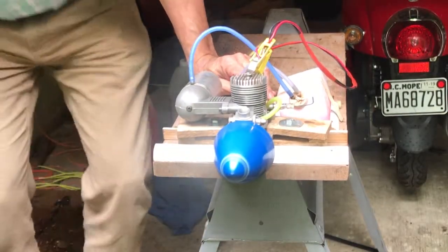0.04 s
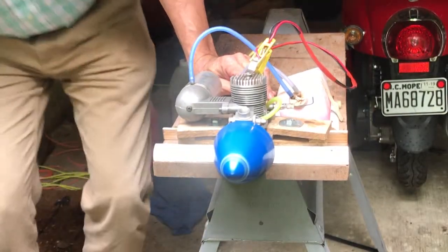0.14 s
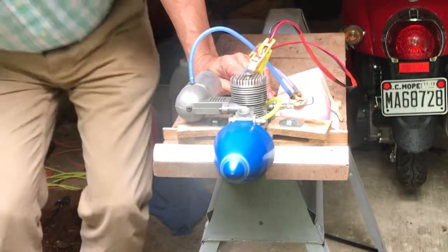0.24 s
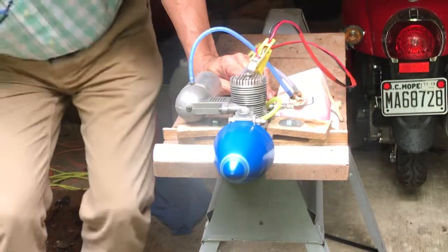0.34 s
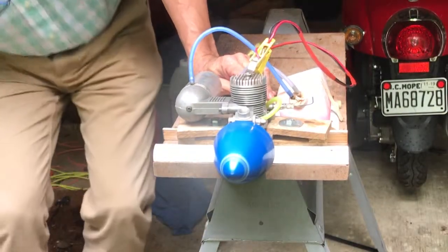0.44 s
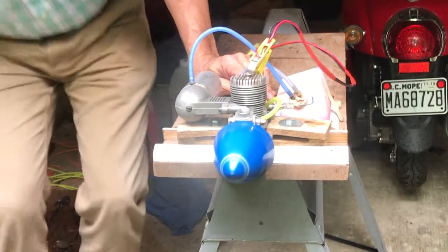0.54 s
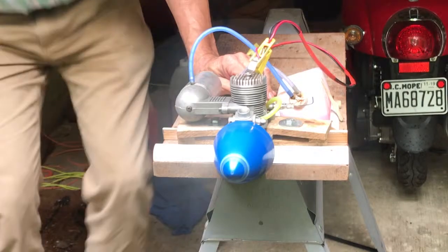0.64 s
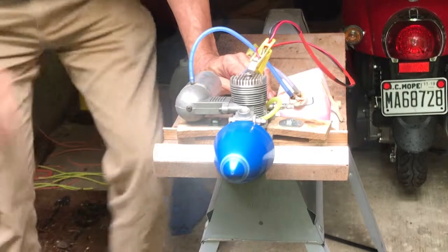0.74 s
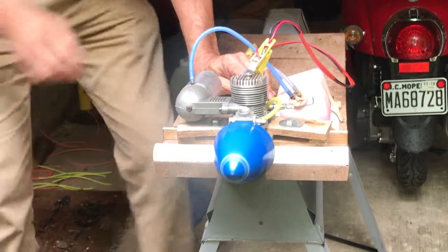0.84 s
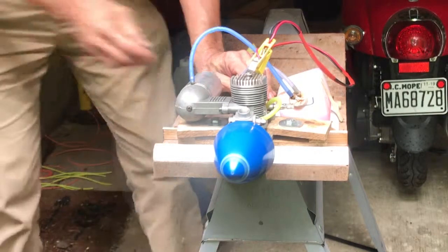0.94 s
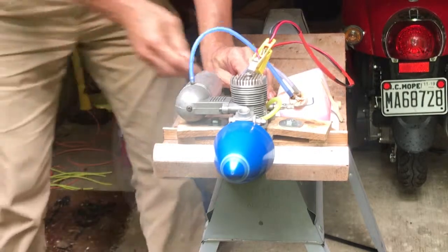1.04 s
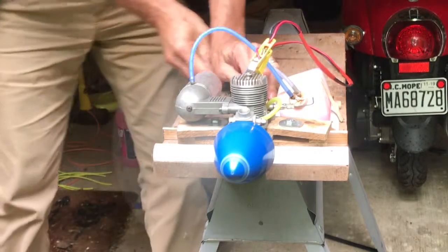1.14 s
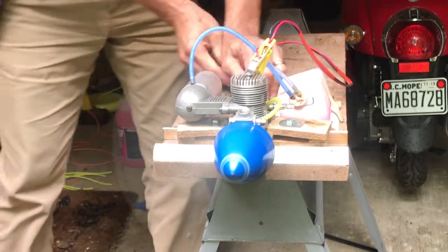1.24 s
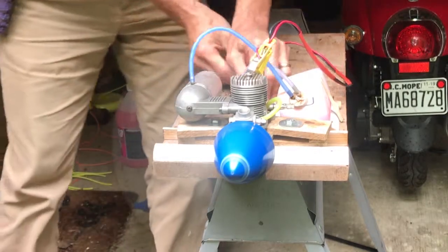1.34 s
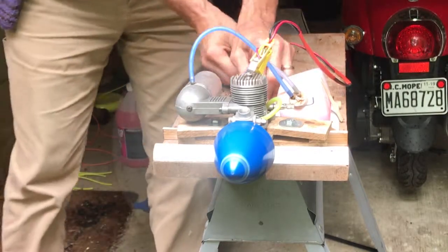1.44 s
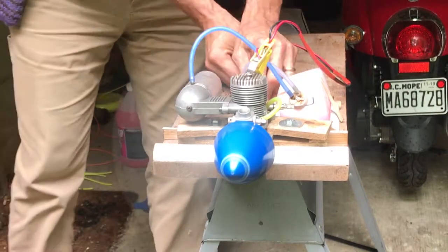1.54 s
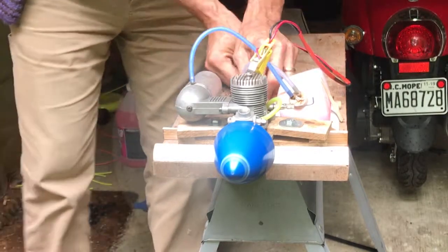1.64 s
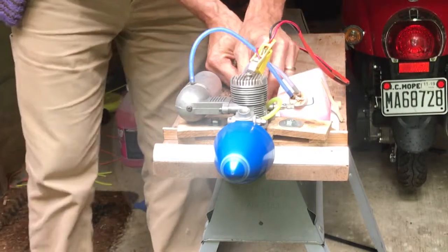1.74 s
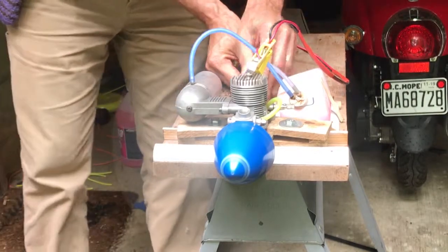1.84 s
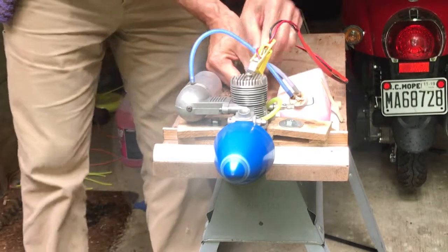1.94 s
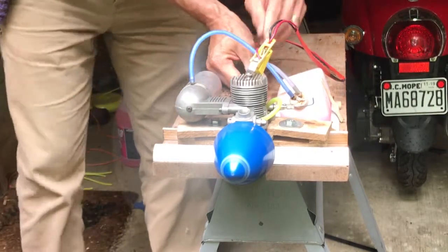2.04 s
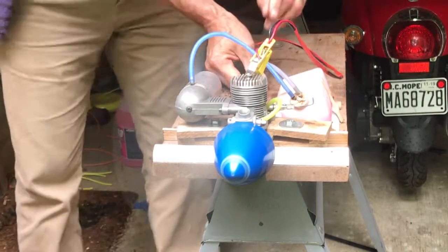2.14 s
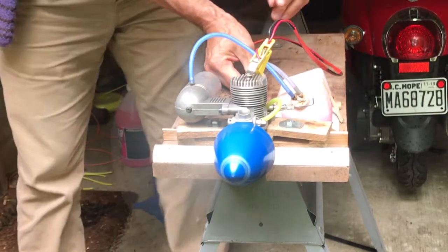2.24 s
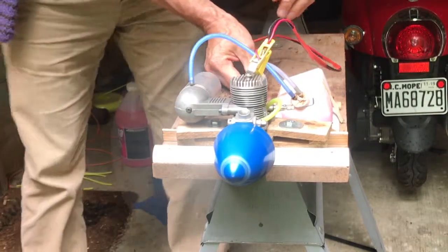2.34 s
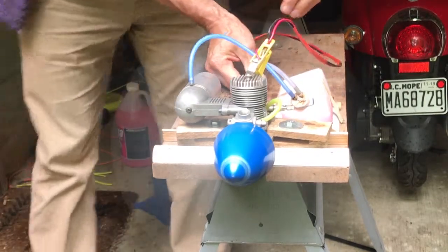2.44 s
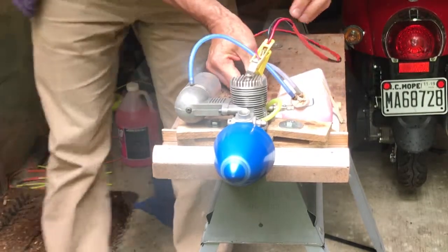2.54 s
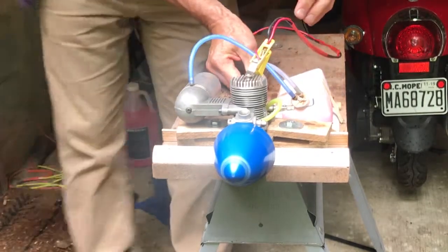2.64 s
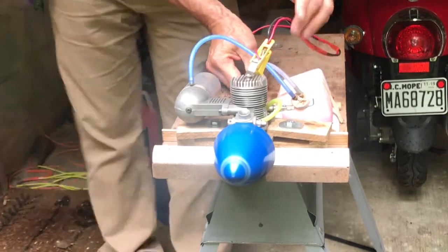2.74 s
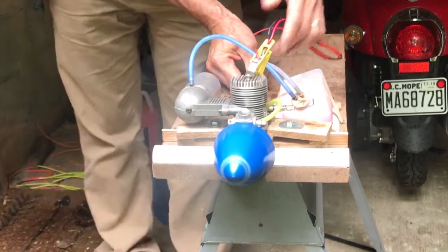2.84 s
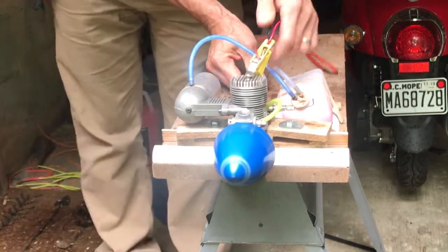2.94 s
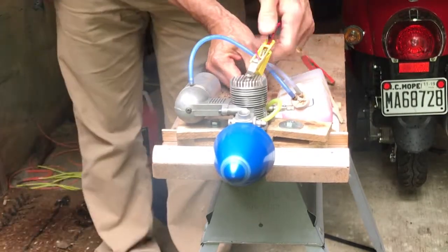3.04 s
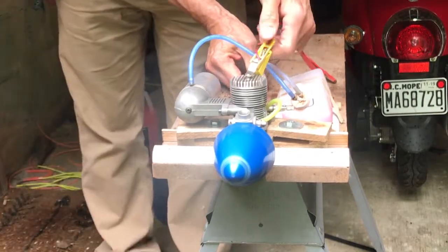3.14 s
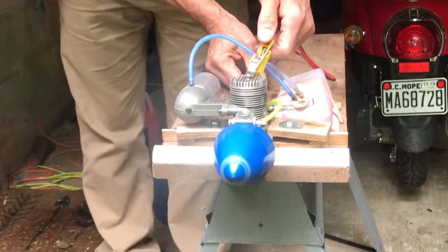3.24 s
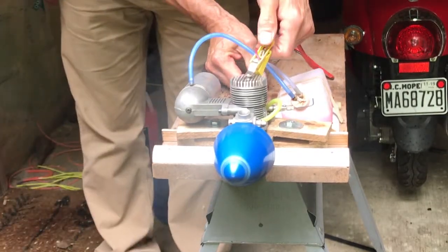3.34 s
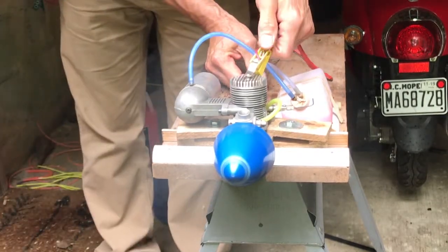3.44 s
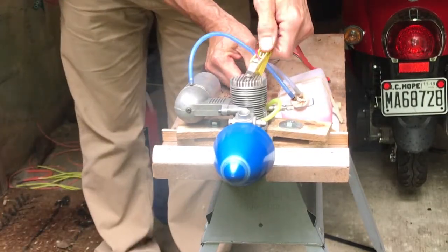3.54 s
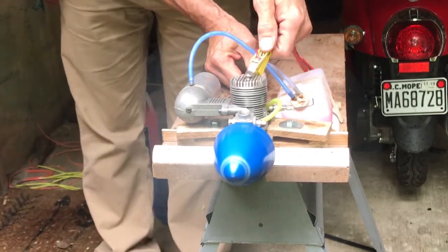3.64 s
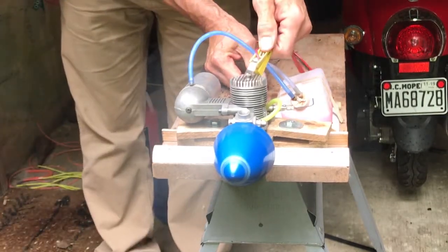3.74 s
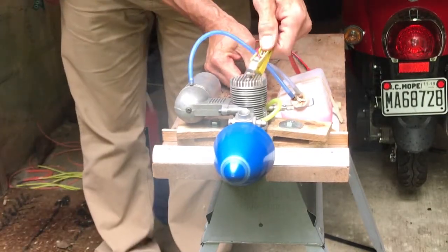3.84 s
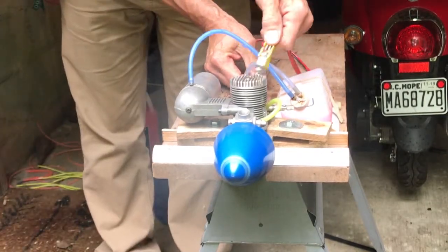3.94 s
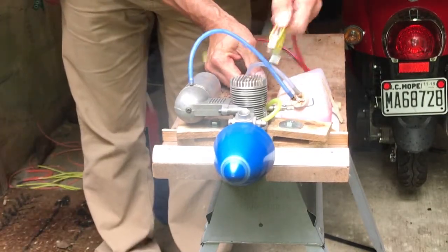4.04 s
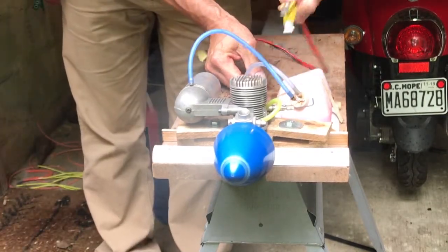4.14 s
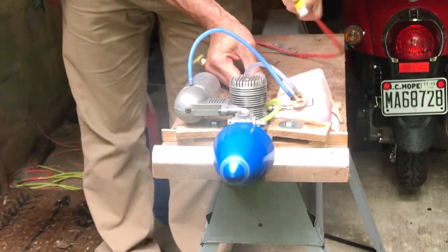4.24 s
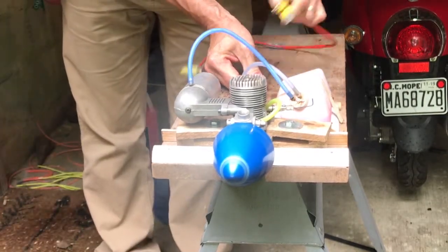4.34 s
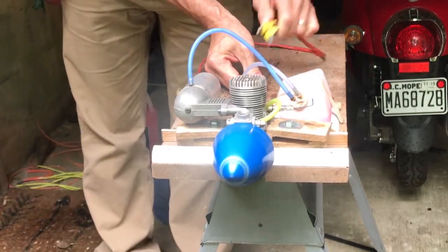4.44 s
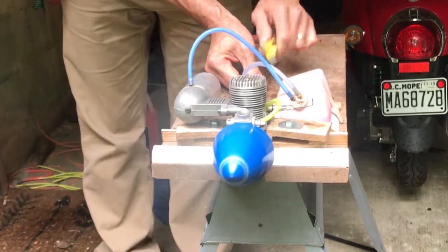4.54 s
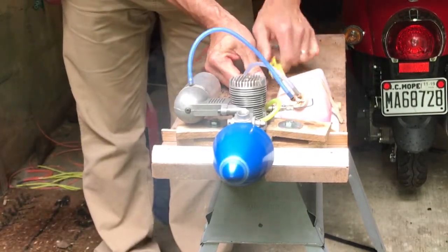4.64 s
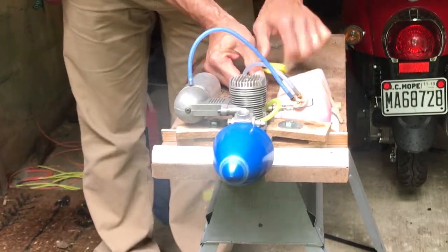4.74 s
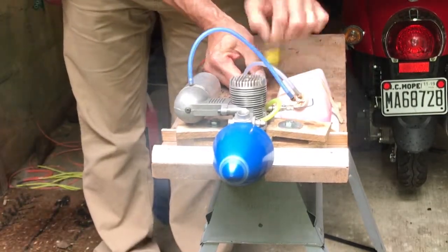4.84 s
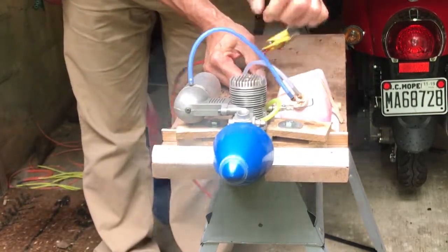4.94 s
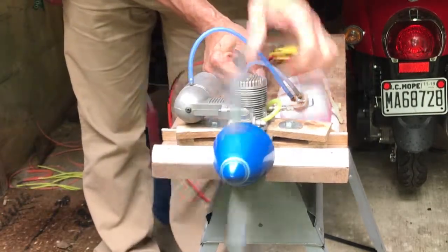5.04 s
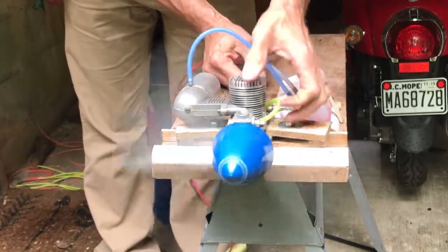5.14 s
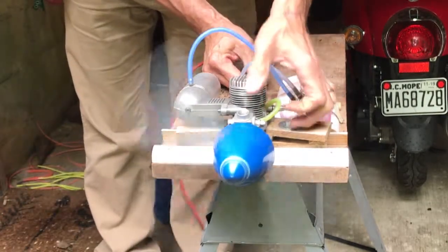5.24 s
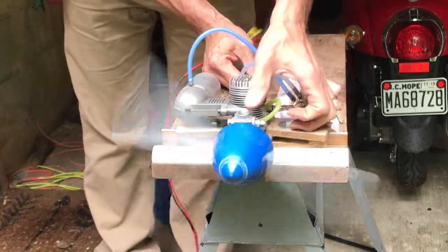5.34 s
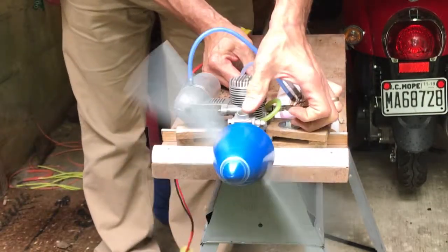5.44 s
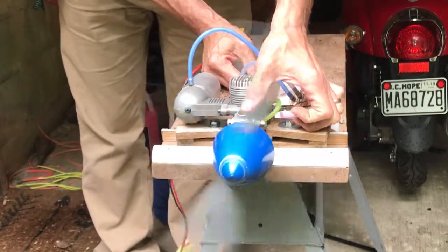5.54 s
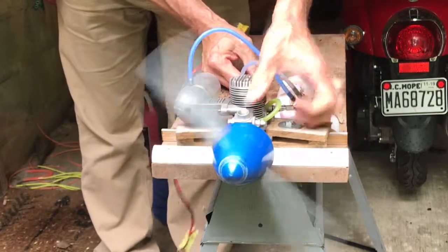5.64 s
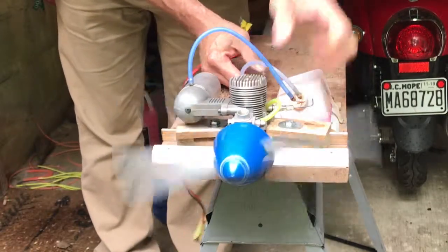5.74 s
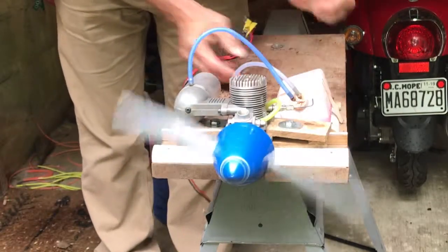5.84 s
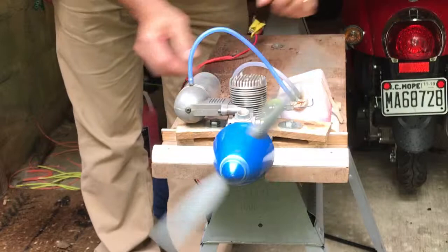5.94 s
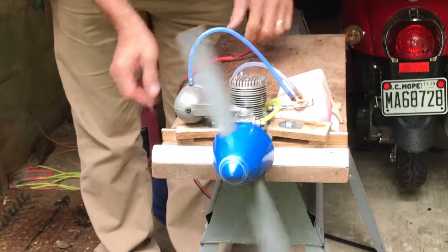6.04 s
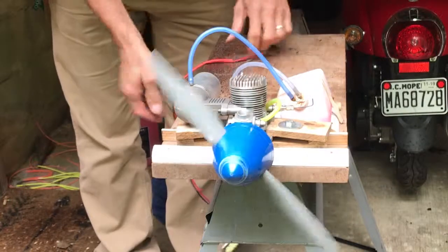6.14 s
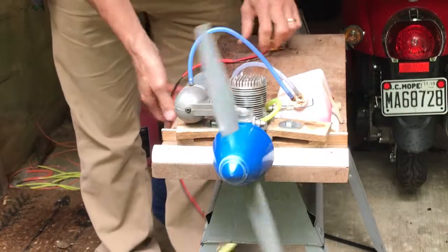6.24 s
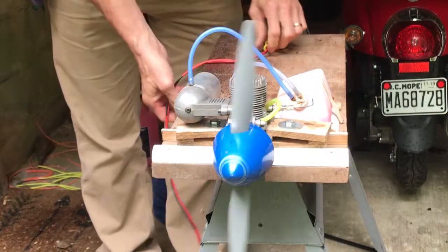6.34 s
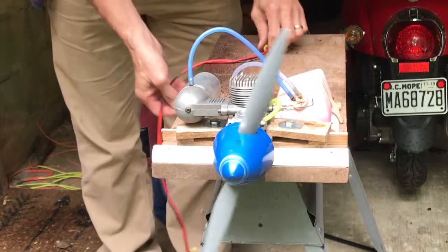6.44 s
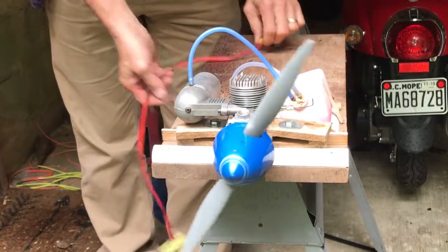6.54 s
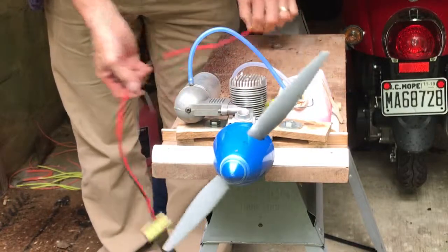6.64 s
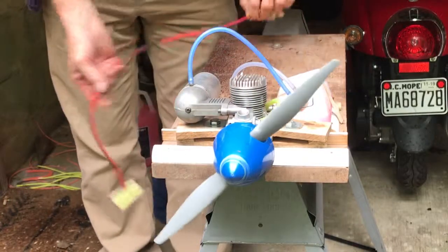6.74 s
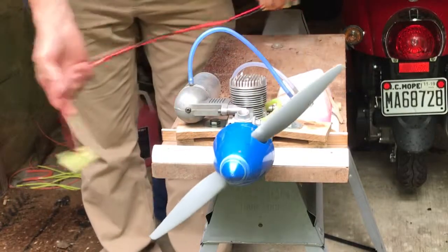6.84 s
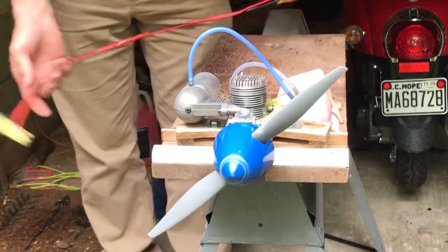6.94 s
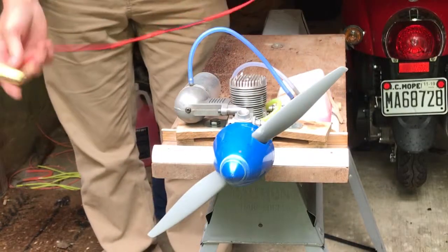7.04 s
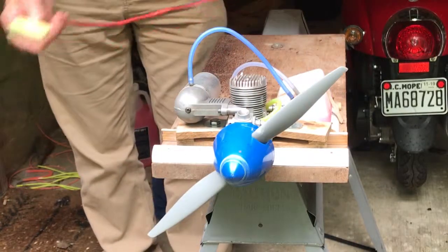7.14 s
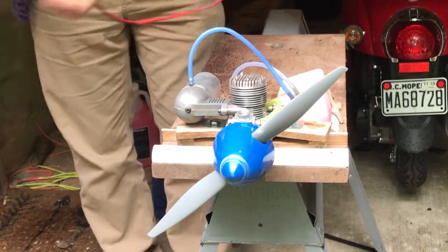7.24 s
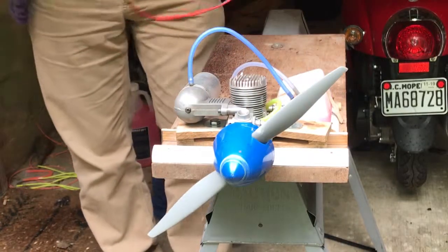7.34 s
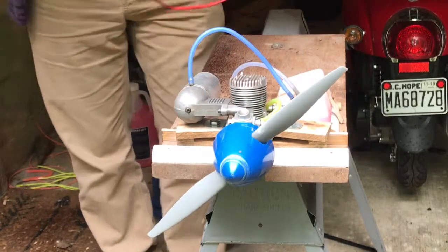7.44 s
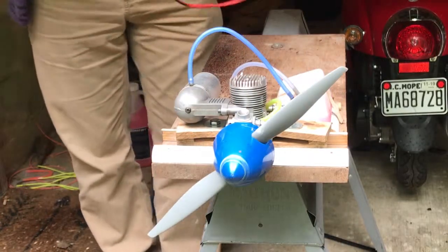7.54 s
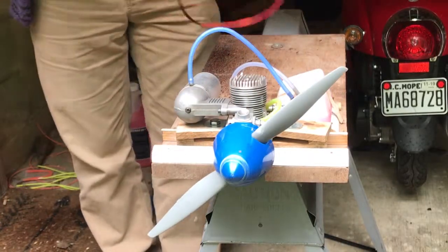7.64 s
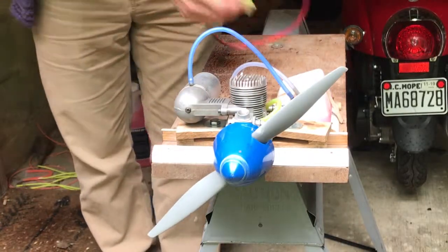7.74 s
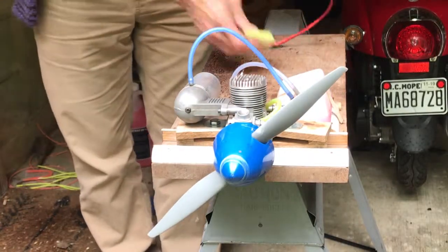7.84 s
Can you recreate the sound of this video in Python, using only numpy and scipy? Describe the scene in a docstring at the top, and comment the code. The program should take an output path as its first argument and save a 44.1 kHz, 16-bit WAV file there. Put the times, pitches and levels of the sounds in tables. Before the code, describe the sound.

A small two-stroke model aircraft engine runs close by with a loud, rough buzz. It climbs to a high scream, then sags, stumbles and stops firing. The propeller coasts down with slowing chuffs. A metal clip ticks, a few knocks hit the wooden stand, and a plastic grip is set down with a tap. Faint birds and a low outdoor rumble reach the open garage.

```python
"""A rough, rasping buzz climbs to a scream, sags and dies: a two-stroke glow engine, first rich, then
leaned out, drives a two-blade propeller on a wooden test stand in a garage. Exhaust pulses and rushing
gas ring the silencer. Once firing stops, the propeller coasts down, chuffing against the compression.
The glow-plug lead is put away: its clip ticks and knocks, its grip taps, the cable slides over the bench.
Far birds call over a low outdoor rumble."""
import sys
import numpy as np
from scipy import signal
from scipy.io import wavfile
from scipy.ndimage import uniform_filter1d

SR = 44100
rng = np.random.default_rng(int(sys.argv[2]) if len(sys.argv) > 2 else 0)


def int16_out(signal):
    """Quantize to a 16-bit WAV file."""
    q = np.round(np.clip(np.atleast_2d(signal).T, -1, 1) * 32767)
    wavfile.write(sys.argv[1], SR, q.astype(np.int16))


N = 347508
T = np.arange(N) / SR
STUMBLE_BELOW = 108  # turns a second under which the firing grows uneven


def amp(db):
    """Decibels to gain."""
    return 10 ** (np.asarray(db) / 20)


def unit(x):
    """Scales to rms 1."""
    return x / np.sqrt(np.mean(x ** 2) + 1e-20)


def steady(x, size=2600):
    """Scales to a running rms of 1."""
    return x / np.sqrt(np.abs(uniform_filter1d(uniform_filter1d(x ** 2, size), size)) + 1e-12)


def curve(rows, column=1):
    """One column of a time table at every sample."""
    rows = np.array(rows)
    return np.interp(T, rows[:, 0], rows[:, column])


def read(points, hz):
    """Reads a table on a log-frequency axis."""
    f, value = np.transpose(points)
    return np.interp(np.log(hz + 1), np.log(f + 1), value)


def colour(x, eq, size=4096):
    """Minimum-phase EQ of unit energy: the table sets only the spectral shape."""
    log_gain = np.log(amp(np.maximum(read(eq, abs(np.fft.fftfreq(size, 1 / SR))), -100)))
    taps = np.fft.ifft(np.exp(np.conj(signal.hilbert(log_gain)))).real[:size // 2]
    return signal.oaconvolve(x, taps / np.linalg.norm(taps))[:N]


def noise():
    """White noise of rms 1."""
    return rng.standard_normal(N)


def wander(per_s):
    """Smooth random drift of rms 1."""
    knots = rng.standard_normal(N // 20)
    return unit(np.interp(T * per_s, np.arange(len(knots)), knots))


def resonate(x, hz, width_hz):
    """A steep resonance at a fixed or gliding pitch."""
    carrier = np.exp(2j * np.pi * np.cumsum(np.full(N, hz)) / SR)
    r = np.exp(-np.pi * width_hz * np.sqrt(2) / SR)
    return 2 * (carrier * signal.lfilter([(1 - r) ** 2], [1, -2 * r, r * r], x / carrier)).real


def bursts(rows, rise, decay):
    """Envelope that swells and dies at each event (t/s, level/dB); rise and decay in seconds."""
    out, t = np.zeros(N), T[:SR // 2]
    shape = (1 - np.exp(-t / rise)) * np.exp(-t / decay)
    for start, db, *_ in rows:
        part = out[round(start * SR):][:len(t)]
        part += amp(db) * shape[:len(part)] / shape.max()
    return out


def strike(rows, ring, column=1):
    """Sets off the same ring at every event."""
    blows = np.zeros(N)
    for row in rows:
        blows[round(row[0] * SR)] += amp(row[column])
    return signal.oaconvolve(blows, ring)[:N]


def garage(x, wet_db):
    """Near echoes, then a diffuse tail whose treble dies first."""
    echoes = [(.0013, 0.14), (.0031, 0.45), (.0074, 0.22)]  # off bench, floor and walls: delay/s, gain
    decay = [(600, 0.29), (3000, 0.12), (15000, 0.076)]  # reverb time: f/Hz, t60/s
    diffuse = rng.standard_normal(SR // 2) * (T[:SR // 2] > .004)
    hz, t, bands = signal.stft(diffuse, SR, nperseg=256)
    tail = signal.istft(bands * amp(-60 * t / read(decay, hz)[:, None]), SR, nperseg=256)[1]
    response = amp(wet_db) * tail / np.linalg.norm(tail)
    response[0] += 1
    for delay, gain in echoes:
        response[round(delay * SR)] += gain
    return signal.oaconvolve(x, response / np.linalg.norm(response))[:N]


def background():
    """Low outdoor rumble through the open door."""
    air_eq = [(20, -20.5), (55, -1.5), (200, -13.5), (330, -22), (3000, -34.5), (16000, -44.5)]  # outdoor air: f/Hz, level/dB
    return amp(-59.5) * unit(colour(noise(), air_eq)) * amp(1.2 * wander(16))


def birds(chirp_hz=3280, chirps_from_s=6.94, every_s=.128, trill_hz=2750, trill_from_s=6.58):
    """Five faint, unequal chirps slide up to their pitch over a thin, fading trill."""
    t, since = T[:SR // 14], np.maximum(T - trill_from_s, 0)
    glide_hz = chirp_hz - 500 * np.exp(-t / .011)
    chirp = np.sin(2 * np.pi * np.cumsum(glide_hz) / SR) * np.hanning(len(t))
    calls = [(chirps_from_s + i * every_s, -71 + 2 * rng.standard_normal()) for i in range(5)]
    trill = unit(resonate(noise(), trill_hz, 70)) * (since > 0) * amp(-74 - 3.3 * since)
    return garage(strike(calls, chirp) + trill, wet_db=-7.5)


def cable():
    """The lead rubs over the bench: a grainy slide and two soft swishes."""
    sliding = [(5.94, -85), (6.0, -53), (6.08, -72), (6.7, -72), (7.5, -75), (7.88, -67)]  # friction envelope: t/s, level/dB
    swishes = [(6.8, -68), (7.38, -67)]  # pulls on the cable: t/s, level/dB
    cloth_eq = [(300, 0), (5000, 4), (10000, -9), (13000, -2), (16000, -15)]  # cable and cloth rubbing: f/Hz, level/dB
    outside_s = abs(T - np.clip(T, sliding[0][0], sliding[-1][0]))
    envelope = amp(curve(sliding) - 2) * np.exp(-outside_s / .079)
    slide = colour(noise(), cloth_eq) * envelope * amp(2.8 * wander(75))
    return slide + colour(noise(), cloth_eq) * bursts(swishes, rise=.12, decay=.058)


def grip():
    """The lead's plastic grip is set down with a dry double tap."""
    taps = [(7.594, -41), (7.6078, -27.5)]  # contacts: t/s, level/dB
    plastic_eq = [(200, -10), (700, -2), (1900, 1), (2600, -7), (5800, -3), (7000, -15), (16000, -16)]  # the grip's body: f/Hz, level/dB
    return garage(colour(strike(taps, [1.]), plastic_eq), wet_db=-10)


def clip_ticks():
    """The metal clip makes light, bright contacts."""
    ticks = [(5.1644, -29), (5.378, -34), (5.4544, -36), (5.677, -40), (5.9653, -36), (6.1803, -37.5),
             (6.6383, -40)]  # contacts: t/s, level/dB
    metal_eq = [(500, 7), (5000, 0.5), (9000, 1), (16000, -10)]
    contacts = amp(-11.5) * noise() * bursts(ticks, rise=.00047, decay=.0031)
    return garage(colour(contacts, metal_eq), wet_db=-1.5)


def knocks():
    """Blows crack on the wood and ring the stand's metal."""
    blows = [(5.2342, -54, -45), (5.446, -51, -46), (5.4723, -36.5, -52), (5.752, -60, -60),
             (5.9654, -38, -64), (6.288, -26.5, -69), (6.2915, -25.5, -49)]  # hits on the stand: t/s, crack level/dB, ring level/dB
    wood_eq = [(120, -54), (400, -21), (1000, -10), (1650, -5.5), (2100, -6.5), (3000, -3.5), (5500, -20),
               (9000, -47)]  # struck wood: f/Hz, level/dB
    modes = [(533, 5, 0.29), (385, -8.5, 0.41), (1030, -2, 0.13), (1465, -13, .1)]  # the stand's ring: f/Hz, level/dB, t60/s
    t = T[:SR // 2]
    ring = sum(amp(db - 60 * t / t60) * np.sin(2 * np.pi * hz * t) for hz, db, t60 in modes)
    crunch = amp(-6.5) * noise() * bursts(blows, rise=.00032, decay=.0037)
    click = amp(7.5) * strike(blows, [1.])
    return garage(colour(crunch + click, wood_eq), wet_db=-2.5) + strike(blows, ring, column=2)


def speed(coast_from_s=4.8, drag_s=.18, friction=7.377):
    """Crank turns a second: driven while it fires, then slowed by air drag and friction."""
    driven = [(0.0, 112.1), (0.3, 116.5), (0.59, 119.0), (0.89, 117.3), (1.11, 121.7), (1.32, 112.0),
              (1.41, 109.7), (1.6, 108.5), (1.66, 109.3), (1.75, 119.6), (1.95, 138.6), (2.14, 160.5),
              (2.23, 165.8), (2.66, 173.4), (2.83, 173.3), (3.03, 169.6), (3.27, 160.2), (3.39, 151.2),
              (3.56, 140), (3.98, 117.9), (4.19, 104.7), (4.3, 92.0), (4.43, 83.7), (4.52, 85.8),
              (4.63, 58)]  # crankshaft under power: t/s, speed/(turns/s)
    since = np.maximum(T - coast_from_s, 0)
    coasting = np.maximum(29.28 * np.exp(-since / drag_s) + 12.4 - friction * since, 0)
    return np.where(T < coast_from_s, curve(list(driven) + [(coast_from_s, coasting[0])]), coasting)


def burning(stop_s=4.53, fade_s=.08):
    """1 while the engine fires, dying away when it stops."""
    return np.exp(-np.maximum(T - stop_s, 0) / fade_s)


def leanness(rich_hz=125, lean_hz=168):
    """0 while the engine runs rich and rough, 1 when it fires cleanly at full speed."""
    return np.clip((speed() - rich_hz) / (lean_hz - rich_hz), 0, 1)


def crank(splice_s=.696, splice_turns=.7, top_centre_s=5.351):
    """Crank turns, whole at top centre; uneven burning makes the speed waver."""
    waver = .001 + .001224 * np.maximum(STUMBLE_BELOW - speed(), 0) * burning()
    turns = np.cumsum(speed() * (1 + waver * wander(60))) / SR
    # a splice-like cut makes the sound jump once with a small bump
    turns -= splice_turns * (T > splice_s)
    return turns - np.interp(top_centre_s, T, turns) % 1


def tone(turns, order):
    """A sine of rms 1 at a multiple of the crank speed."""
    return np.sqrt(2) * np.sin(2 * np.pi * (order * turns + rng.random()))


def port_pulses(turns, scatter_db, jitter_s):
    """A sharp pulse each time the exhaust port opens, scattered in strength and time."""
    count = np.arange(1, int(turns[-1]))
    chance = rng.standard_normal((len(count), 2))
    at = (np.interp(count, turns, T) + jitter_s * chance[:, 0]) * SR
    near = at.astype(int)[:, None] + np.arange(-8, 9)
    pulses = amp(scatter_db * chance[:, 1:]) * np.sinc(near - at[:, None])
    out = np.zeros(N)
    np.add.at(out, np.clip(near, 0, N - 1), pulses)
    return steady(out)


def gusts(turns, share, floor):
    """Noise that surges above a floor once a turn and dies over a share of it."""
    return unit(noise() * (floor + np.exp(-(turns % 1) / share)))


def slowing(db, knee, power):
    """Level in dB that holds down to the knee speed, then sinks as a power of the speed."""
    return db - 10 * np.log10(1 + (knee / np.maximum(speed(), 1)) ** (2 * power))


def strokes(turns, level_db, below, phase=0):
    """Events (t/s, level/dB), one a turn at the given phase, once the speed is below a limit."""
    at = np.flatnonzero((np.diff(np.floor(turns - phase)) > 0) & (speed()[1:] < below))
    return list(zip(T[at], level_db[at]))


def rundown(turns):
    """Without fire the piston pumps, rattles, spits air and plops over compression ever more slowly."""
    rattle_eq = [(40, -19), (90, -4), (250, -0.5), (350, -6), (530, 3), (680, -11.5), (900, -1), (1800, -4),
                 (3300, -6.5), (7000, -27)]  # the coasting mechanism: f/Hz, level/dB
    chuff_eq = [(70, -11), (150, -1), (260, 6), (400, -12), (920, 5.5), (1300, -0.5), (3300, -10),
                (6000, -30)]  # air through the silencer: f/Hz, level/dB
    port_eq = [(2400, -23), (4800, -8), (5400, -2), (6300, 2), (6950, -11), (7800, -2), (8800, -3),
               (10400, -11.5), (11800, -4.5), (16000, -32)]  # intake hiss: f/Hz, level/dB
    leak_eq = [(80, -12), (220, -3.5), (450, -10.5), (1000, -13), (4000, -54)]  # air let go after compression: f/Hz, level/dB
    clatters = [(5.088, -37), (5.138, -36), (5.158, -40), (5.213, -40), (5.243, -43), (5.408, -45),
                (5.697, -52), (5.726, -56)]  # loose parts knock as the crank rocks: t/s, level/dB
    loose_eq = [(200, -10), (650, -7), (880, 5), (1250, -9), (3200, -13.5), (6000, -44)]  # their timbre: f/Hz, level/dB
    unfired = np.sqrt(1 - burning() ** 2)
    shake = unfired * amp(slowing(-25, knee=26.8, power=3.83))
    spin = np.clip((speed() - 20) / 40, 0, 1)
    pumping = port_pulses(turns, scatter_db=1, jitter_s=0) * spin
    rattle = (.7 * gusts(turns, share=.13, floor=.55) + .35 * pumping) * shake
    whirr = amp(-14.5) * (tone(turns, 1.8) + tone(turns, 2.4)) * shake * spin
    # the silencer chuffs once a turn, between the spits of the intake
    chuffs = strokes(turns, slowing(-24.5, knee=18.5, power=6), below=60, phase=.647)
    puffs = noise() * bursts(chuffs, rise=.0017, decay=.0042)
    spits = strokes(turns, slowing(-14.5, knee=25.8, power=10), below=48)
    spitting = amp(-12) * bursts(spits, rise=.004, decay=.0026)
    hiss = noise() * (unfired * amp(slowing(-29, knee=80, power=2.3)) + spitting)
    # each slow compression lets go with a plop and a rough puff
    releases = strokes(turns, slowing(-33, knee=8.5, power=2.5), below=26)
    t = T[:SR // 8]
    plop = np.sin(2 * np.pi * 215 * t) * (t / .0036) ** 2 * np.exp(-t / .0024)
    plops = amp(10) * strike(releases, plop) + amp(5) * strike(chuffs, plop)
    leak = amp(-8) * colour(noise() * bursts(releases, rise=.003, decay=.007), leak_eq)
    clatter = colour(noise() * bursts(clatters, rise=.0047, decay=.0073), loose_eq)
    air = colour(puffs, chuff_eq) + colour(hiss, port_eq) + leak
    return garage(colour(rattle, rattle_eq) + air + clatter, wet_db=-6) + whirr + plops


def stand_hum(hz=535, width_hz=22):
    """The rich-running engine keeps the stand's strongest mode ringing."""
    return amp(-41) * unit(resonate(noise(), hz, width_hz)) * burning() * (1 - leanness())


def propeller(turns, build_up=1.5):
    """Shaft, blades and firing give pure tones that swell at resonances and as the engine gains speed."""
    resonances = [(1, 108, 4.4, -38), (1, 140, 11, -30.5), (2, 170, 11, -30.5), (2, 259.5, 42, -27),
                  (2, 342, 12, -24.5), (3, 255, 36, -28), (3, 415, 23, -37.5), (4, 436, 36, -33.5),
                  (5, 542, 6.5, -30.5), (5, 590, 25, -37.5), (5, 815, 26, -35)]  # swept by crank harmonics: order, f/Hz, half width/Hz, level/dB
    rate, out = speed(), np.zeros(N)
    acceleration = uniform_filter1d(np.gradient(rate) * SR, size=9000)
    for order in sorted({row[0] for row in resonances}):
        swell = np.zeros(N)
        for _, hz, width, db in (row for row in resonances if row[0] == order):
            response = 1 / (1 + ((order * rate - hz) / width) ** 2)
            smoothing = min(round(build_up * SR / width), SR // 4)  # narrow ones swell slowly
            swell += amp(db) * uniform_filter1d(response, smoothing)
        out += tone(turns, order) * swell * amp(wander(8.9))
    return out * amp(.03 * acceleration) * burning()


def standing_waves(pulses, lean):
    """Standing waves around the stand lift passing overtones; rich firing is too blunt for high ones."""
    modes = [(1214, 30, 18), (1299, 44, 21), (1388, 40, 16.5), (1561, 42, 14), (1644, 34, 16),
             (2395, 75, 18.5), (3061, 52, 14), (4320, 52, 14), (4505, 52, 12)]  # air resonances: f/Hz, width/Hz, level/dB
    blunt = amp(-5 * (1.5 - lean))
    return sum(amp(db) * resonate(pulses, hz, width) * (blunt if hz > 2000 else 1)
               for hz, width, db in modes)


def flutter(x, hz, width_hz, depth_db=4.5, per_s=24):
    """A pipe mode in turbulent gas: its pitch and strength waver on their own."""
    mode = resonate(x, hz * (1 + .003 * wander(per_s)), width_hz)
    return mode * amp(depth_db * np.tanh(wander(per_s)))


def whistles(drive, heat, low_hz=2870, high_hz=5470):
    """The jet at the outlet locks on to one pipe mode or the other."""
    lock = [(0.15, 4.5), (0.65, 2), (0.98, 6), (1.25, -1.5), (1.62, 0), (2.14, -3), (2.24, 3), (2.45, -1),
            (2.8, -2.5), (3.1, 2.5), (3.55, 1.5), (4.45, -3)]  # the jet's tilt toward the high whistle: t/s, level/dB
    low = steady(resonate(drive, low_hz * heat, 110), size=9000)
    high = steady(resonate(drive, high_hz * heat, 80), size=9000)
    return amp(-3 - curve(lock)) * low + amp(-5 + curve(lock)) * high


def exhaust(turns, bark_hz=1300, thud_hz=450, misfire_db=3):
    """Pulses and rushing gas ring the silencer, whose modes rise together as it heats."""
    faders = [(0.0, -21.5, -19), (0.06, -26, -17.5), (1.6, -26, -23.5), (1.74, -24.5, -18),
              (2.35, -22.5, -31.5), (2.53, -24.5, -23.5), (2.62, -24, -33), (2.89, -24, -27.5),
              (3.06, -24.5, -36.5), (4.19, -29.5, -24.5), (4.52, -29, -20.5)]  # exhaust loudness: t/s, treble level/dB, bark level/dB
    pipe_pitch = [(0, 5475), (1.09, 5540), (1.33, 5360), (1.6, 5470), (1.8, 5640), (2.1, 5837), (2.8, 5954),
                  (3.43, 5787), (3.75, 5680), (4.5, 5270)]  # the high whistle, following the gas heat: t/s, f/Hz
    pipe_modes = [(4200, 130, 4), (6704, 140, 0), (8040, 300, -1.5), (9120, 360, -5), (10520, 340, -9.5)]  # weaker silencer modes: f/Hz, width/Hz, level/dB
    crack_eq = [(150, -29), (520, -4.5), (950, -4.5), (2000, -2.5), (3600, -2.5), (5000, -6), (8500, -6.5),
                (16000, -17)]  # exhaust pulses: f/Hz, level/dB
    rush_eq = [(30, -24), (90, -7), (300, -3.5), (1800, 1), (3500, 0.5), (4900, -6.5), (9300, -0.5),
               (10400, -7.5), (11300, -3.5), (16000, -9.5)]  # rushing gas: f/Hz, level/dB
    heat = curve(pipe_pitch) / 5470  # pitch ratio
    lean = leanness()
    halfway = lean * (1 - lean)  # peaks between rich and lean, where the pipe sputters most
    pulses = port_pulses(turns, scatter_db=.47, jitter_s=7e-6)
    gas = gusts(turns, share=.37, floor=.99)
    # near stalling the firing turns irregular and the pulses dissolve into gas
    regular = np.minimum(speed() / STUMBLE_BELOW, 1) ** 3
    stalling = 1 - regular
    drive = pulses + (1.65 - 1.2 * regular - .2 * lean) * gas
    bark = resonate(pulses + 1.5 * stalling * gas, bark_hz * heat, 260)
    bark = steady(garage(bark, wet_db=-17), size=6000) * amp(curve(faders, column=2) - 4.5 - 7 * lean)
    crack = steady(garage(colour(pulses, crack_eq), wet_db=15)) * amp(2 - .5 * lean)
    rush = steady(colour(gas, rush_eq)) * amp(1.15 - 3.9 * lean + 1.8 * wander(70))
    sputter = amp((1.2 + 8 * halfway) * np.tanh(wander(45)))
    pipe = sum(amp(db) * flutter(drive, hz * heat, width) for hz, width, db in pipe_modes)
    pipe = steady(pipe, size=12000) * sputter * amp(-5.5 + .5 * lean + 13 * halfway)
    scream = whistles(drive, heat) * sputter * amp(18 * halfway - 1.2 * lean)
    ringing = regular * (scream + standing_waves(pulses, lean))
    treble = amp(curve(faders)) * (crack + rush + pipe + ringing)
    # slow, heavy firings thud in the silencer's body and differ in strength
    thud = amp(-29) * stalling * steady(resonate(drive, thud_hz, 300))
    misfires = amp(misfire_db * stalling * np.tanh(wander(70)))
    return burning() * misfires * (bark + thud + treble)


def scene():
    """The engine on its stand, the lead being put away and the outdoors, in mono."""
    turns = crank()
    engine = exhaust(turns) + propeller(turns) + stand_hum() + rundown(turns)
    handling = knocks() + clip_ticks() + grip() + cable()
    return (engine + handling + birds() + background())[None]


def record(dry, ceiling=.94, cutoff_hz=15900):
    """A soft limiter rounds off the highest peaks and a low-pass trims the top."""
    limited = dry / (1 + (dry / ceiling) ** 6) ** (1 / 6)
    low_pass = signal.firwin(511, cutoff_hz, window=("kaiser", 9), fs=SR)
    return signal.oaconvolve(limited, low_pass[None], "same")


dry = scene()
out = record(dry)
int16_out(out)
```